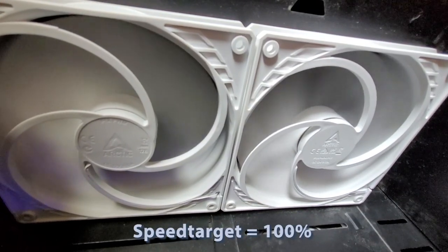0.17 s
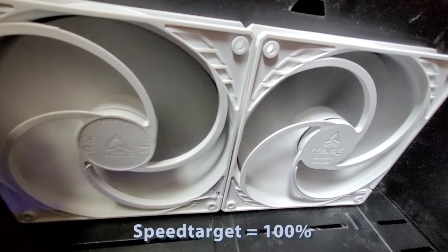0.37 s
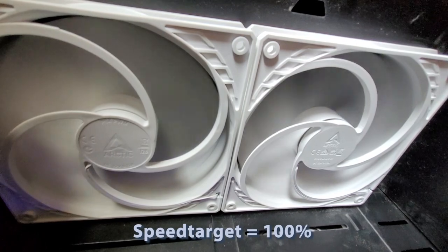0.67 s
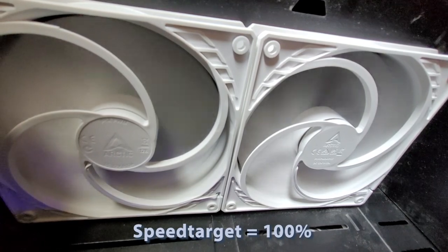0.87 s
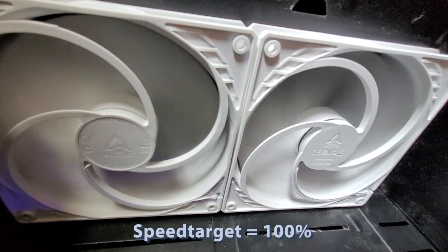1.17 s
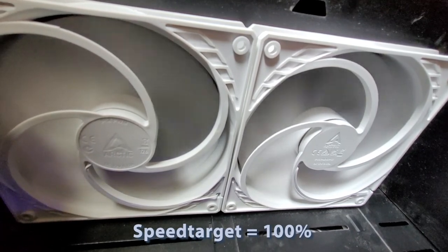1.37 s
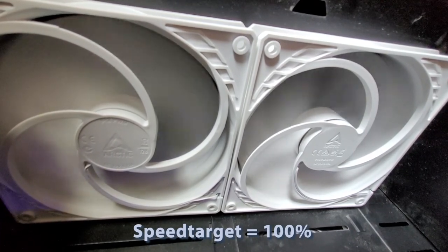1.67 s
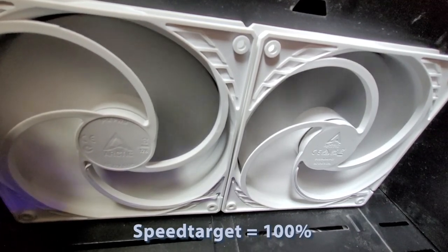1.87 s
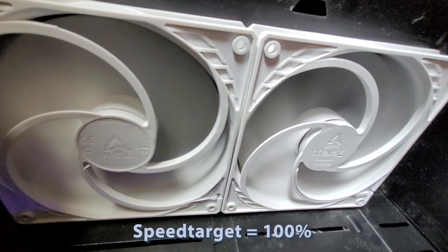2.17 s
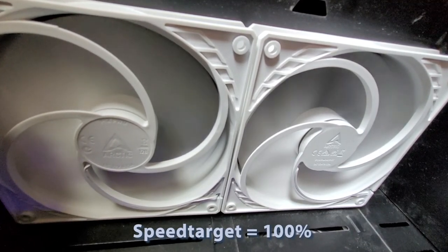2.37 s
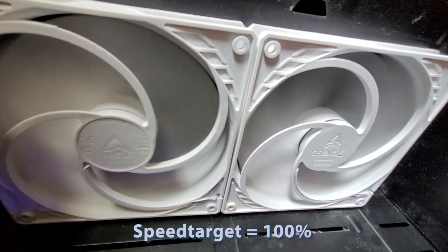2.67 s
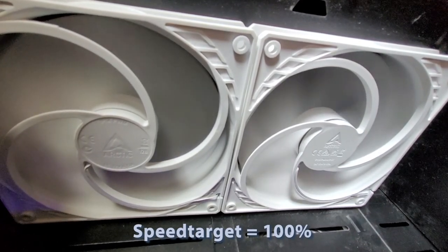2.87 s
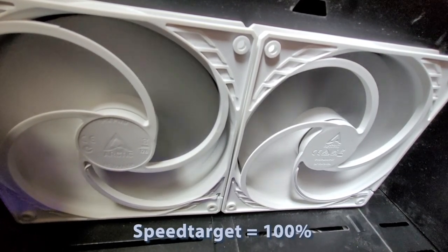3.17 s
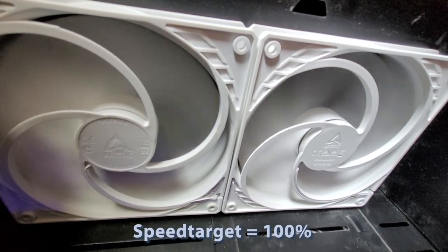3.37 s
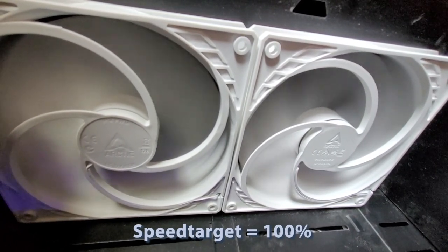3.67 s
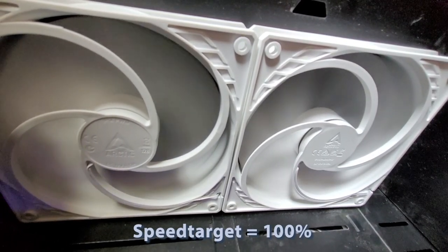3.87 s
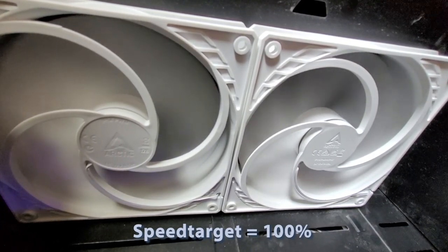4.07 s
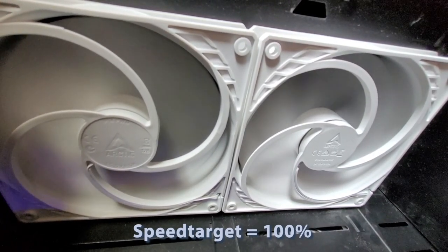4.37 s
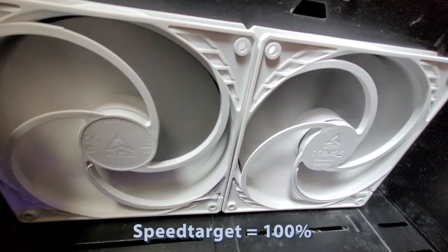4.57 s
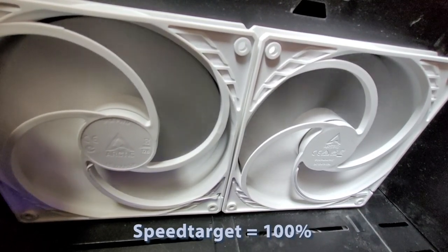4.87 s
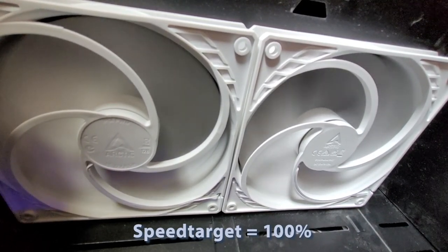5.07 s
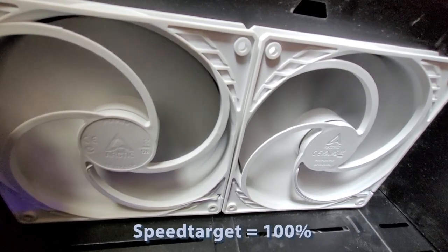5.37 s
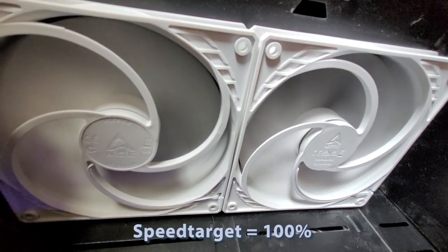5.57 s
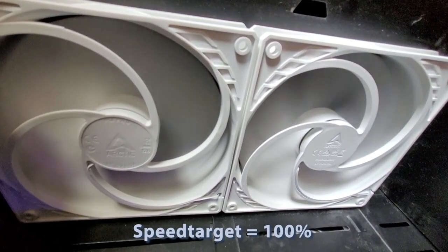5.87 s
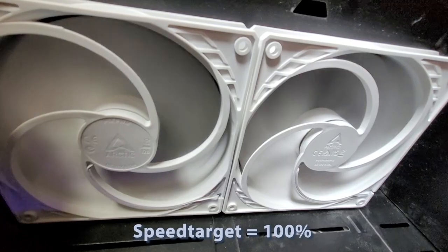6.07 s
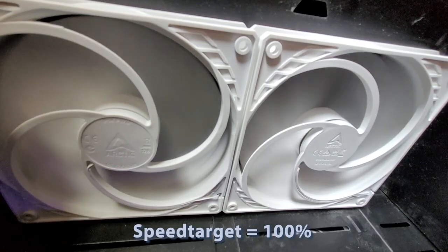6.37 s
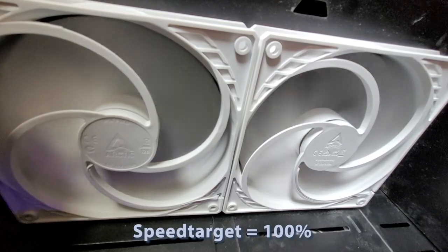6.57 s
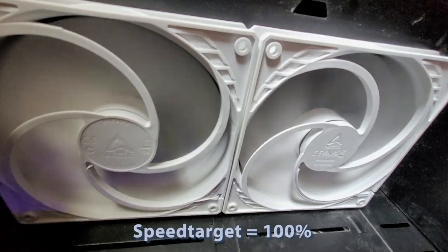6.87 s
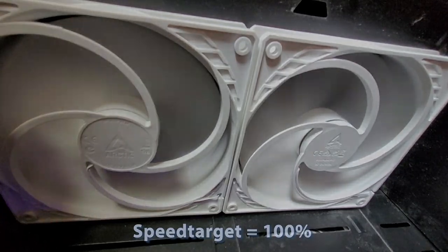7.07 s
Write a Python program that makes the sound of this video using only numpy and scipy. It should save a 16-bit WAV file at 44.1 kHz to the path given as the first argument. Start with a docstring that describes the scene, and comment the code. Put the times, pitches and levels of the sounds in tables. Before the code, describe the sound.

Constant whooshing of fast case fans with a droning low hum and faint whine, gusty low rumble and irregular soft thuds on the left.

```python
"""Two five-bladed computer case fans, heard by a phone close by inside the metal case.
Blade rush is shaped noise; it rings the case's cavities and a whirr of wavering pitch, with brief sizzles.
Each rotor adds sine tones on multiples of its own shaft speed, the two speeds slightly apart.
The draught rumbles on both microphone ports; eddies thump the left one and leak faintly to the right."""
import sys
import numpy as np
from scipy import signal
from scipy.fft import rfft, irfft
from scipy.io import wavfile
from scipy.ndimage import uniform_filter1d, minimum_filter1d

SR = 44100
rng = np.random.default_rng(int(sys.argv[2]) if len(sys.argv) > 2 else 0)


def transcribe(u):
    """Save the signal u as a 16-bit wav file named by the first command-line argument.

    u: samples, shape (n,) or (channels, n), limited to [-1, 1]; the rate is SR.
    q: integer samples, one column per channel.
    """
    v = np.clip(np.atleast_2d(u).T, -1, 1)
    q = np.round(v * 32767).astype(np.int16)
    wavfile.write(sys.argv[1], SR, q)


N = 317520
TIME = np.arange(N) / SR
FREQ_HZ = np.arange(N // 2 + 1) * SR / N

SLOW_FAN_HZ, FAST_FAN_HZ = 26.92, 27.465  # shaft turns per second

# strong eddies at the left port: start_s (centre), level_db (relative), pitch_hz,
# swirl (0 = one clean thump, 1 = all flutter)
STRONG_EDDIES = [(0.106, -16.0, 208.0, 0.49), (0.133, -13, 175, 0.65), (0.167, -14.5, 145.0, 0.43),
                 (0.186, -15.0, 94.0, 0.52), (0.234, -19.0, 299.0, 0.9), (0.242, -13, 101, 0.31),
                 (0.266, -17.5, 55, 0.2), (0.31, -8, 225, 0.45), (0.852, -19.5, 99.0, 0.34),
                 (1.112, -17.0, 120.0, 0.1), (1.481, -18.5, 99.0, 0.25), (1.502, -13.5, 172.0, 0.05),
                 (1.588, -12.5, 185, 0.5), (1.662, -13.0, 172.0, 0.4), (1.668, -13.5, 60.0, 0.05),
                 (1.817, -15.0, 145.0, 0.9), (1.828, -10.5, 203.0, 0.22), (1.893, -11.5, 120.0, 0.78),
                 (2.117, -17.5, 55.0, 0.9), (2.23, -10.5, 88, 0.2), (2.257, -19.0, 55.0, 0.46),
                 (2.42, -13.5, 145.0, 0.4), (2.789, -15.5, 139.0, 0.4), (2.808, -12.5, 241.0, 0.05),
                 (2.83, -12.5, 94.0, 0.4), (2.944, -15.5, 180.0, 0.13), (2.98, -14, 195, 0.7),
                 (2.987, -10.5, 132.0, 0.05), (3.002, -15.5, 117.0, 0.05), (3.016, -12, 120, 0.25),
                 (3.048, -16.5, 55.0, 0.9), (3.151, -18.0, 58.0, 0.9), (3.611, -18.0, 55.0, 0.76),
                 (3.677, -19.0, 78.0, 0.9), (4.301, -17.0, 88.0, 0.05), (4.356, -18.0, 58.0, 0.9),
                 (4.384, -12.0, 168.0, 0.22), (4.659, -16.5, 86.0, 0.05), (4.674, -16.5, 142.0, 0.9),
                 (4.76, -18.5, 55.0, 0.9), (4.818, -20.0, 55.0, 0.05), (4.846, -11.0, 224.0, 0.9),
                 (4.857, -15.0, 129.0, 0.9), (4.901, -10.5, 120.0, 0.76), (5.022, -12, 155, 0.6),
                 (5.034, -14.0, 63.0, 0.34), (5.141, -12.0, 66.0, 0.46), (5.208, -18.0, 99.0, 0.9),
                 (5.243, -20.5, 247.0, 0.05), (5.267, -15.0, 66.0, 0.61), (5.31, -13, 208, 0.35),
                 (5.614, -14.0, 153.0, 0.05), (5.628, -12.0, 106.0, 0.46), (5.648, -16.5, 76.0, 0.1),
                 (6.067, -17.5, 94.0, 0.9), (6.09, -9.5, 142.0, 0.1), (6.175, -10.5, 92.0, 0.37),
                 (6.249, -16.0, 106.0, 0.25), (6.397, -12.5, 94.0, 0.1), (6.587, -18.0, 86.0, 0.67),
                 (6.657, -7.0, 195.0, 0.6), (6.679, -9.5, 114.0, 0.55), (6.699, -16.5, 58.0, 0.9),
                 (6.954, -20.0, 129.0, 0.19), (7.164, -15.5, 106.0, 0.25), (7.179, -18, 55, 0.05)]
# slow fan's sounding multiples of shaft speed, blade pass first: order
SLOW_FAN_ORDERS = [5, 10, 15, 16, 30, 36]


def undb(db):
    """Decibels to gain."""
    return 10 ** (np.asarray(db) / 20)


def unit(x):
    """Scale to an rms of 1."""
    return x / np.sqrt(np.mean(x ** 2))


def walk(rate_hz):
    """Random levels held 1 / rate_hz and slewed twice; rms 1."""
    hold = int(SR / rate_hz)
    held = rng.standard_normal(2000)[np.arange(N) // hold]
    return unit(uniform_filter1d(uniform_filter1d(held, hold), hold))


def noise(points, white=None):
    """Noise of rms 1 with a spectrum of (Hz, relative dB) points, falling steeply outside them."""
    white = rng.standard_normal(N) if white is None else white
    hz, db = np.transpose(points)
    f = np.maximum(FREQ_HZ, 1)
    gain = undb(np.interp(np.log(f), np.log(hz), db))
    gain *= np.minimum(f / hz[0], 1) ** 2
    gain *= np.minimum(hz[-1] / f, 1) ** 20
    return unit(irfft(rfft(white) * gain, N))


def cut(x, hz, kind, order=2):
    """Low-pass or high-pass Butterworth filter."""
    return signal.sosfilt(signal.butter(order, hz, kind, fs=SR, output="sos"), x)


def resonance(white, hz, half_width_hz):
    """Turbulence ringing in one resonance, 6 dB down at half_width_hz off centre; rms 1."""
    return unit(irfft(rfft(white) / (1 + ((FREQ_HZ - hz) / half_width_hz) ** 2), N))


def port_pair():
    """White noise at the two ports, alike or opposed by band through standing waves in the case."""
    # likeness of the two ports: freq_hz, correlation (-1 to 1)
    likeness = [(600, -0.027), (730, -0.45), (860, 0.82), (980, 0.41), (1100, 0.2), (1240, 0.84),
                (1400, -0.62), (1550, 0.0064), (1750, -0.08), (1900, 0.94), (2130, 0.43), (2400, -0.03),
                (3400, -0.16), (5800, 0.057), (6500, -.35), (8000, 0.093)]
    alike = np.interp(FREQ_HZ, *np.transpose(likeness))
    mid = irfft(rfft(rng.standard_normal(N)) * np.sqrt(1 + alike), N)
    side = irfft(rfft(rng.standard_normal(N)) * np.sqrt(1 - alike), N)
    return mid + side, mid - side


def gusts(lull_db=-27.4, gust_db=-34, gust_s=0.09):
    """Left draught gain: each strong eddy adds gust power to the lull, a bell of spread gust_s."""
    swell = sum(np.exp(-0.5 * ((TIME - start_s) / gust_s) ** 2) for start_s, *_ in STRONG_EDDIES)
    return np.sqrt(undb(lull_db) ** 2 + undb(gust_db) ** 2 * swell)


def draught(right_db=-26.5, shared=0.19):
    """Low rumble of air over the ports, partly shared, gusty on the left and steadier on the right."""
    # draught spectrum: freq_hz, level_db (per Hz, relative)
    spectrum = [(15, -49), (30, -20.5), (48, -2.5), (66, -0.5), (92, -5.5), (115, -3.5), (142, -5),
                (175, -15.5), (205, -15.5), (265, -13.5), (350, -24), (425, -26), (500, -41), (800, -47.5)]
    # rms swell of the draught: left_db, right_db
    port_swells_db = (1.8, 1.2)
    both = np.sqrt(shared) * noise(spectrum)
    ports = []
    for gain, swell_db in zip([gusts(), undb(right_db)], port_swells_db):
        rumble = both + np.sqrt(1 - shared) * noise(spectrum)
        ports.append(gain * unit(rumble * undb(swell_db * walk(20))))
    return np.array(ports)


def weak_eddies(count=10, mean_db=-21.5, scatter_db=2.5, centre_hz=102):
    """Weak eddies at random moments, in the columns of STRONG_EDDIES."""
    eddies = []
    for _ in range(count):
        start_s = rng.uniform(0, TIME[-1])
        level_db = mean_db + scatter_db * rng.uniform(-1, 1)
        pitch_hz = centre_hz * 2 ** rng.uniform(-0.5, 0.5)
        eddies.append((start_s, level_db, pitch_hz, rng.uniform(0, 1)))
    return eddies


def port_ring(x, ring_hz=256, ring_db=-1, hollow_hz=205, hollow_depth=0.4, q=3):
    """The air around the port rings briefly after a push, with a hollow just below the resonance."""
    ring = signal.lfilter(*signal.iirpeak(ring_hz, q, fs=SR), x)
    hollow = signal.lfilter(*signal.iirpeak(hollow_hz, q, fs=SR), x)
    return x + undb(ring_db) * ring - hollow_depth * hollow


def buffets(trim_db=0.25, top_hz=235, top_pitch_hz=110, port_hz=53, leak_db=-28):
    """An eddy crossing the left port: a sharp suction in its core, inside a short turbulent swirl."""
    eddy_cycles = 3.3  # slow eddies last longer
    core_cycles, swirl_spread = 0.19, 0.36  # bell spreads: share of a cycle, share of eddy length
    swirl_edge = 0.74  # swirl's gentle low-pass, share of its pitch
    size = SR // 2
    t = (np.arange(size) - size // 2) / SR
    out = np.zeros(N + 2 * size)
    for start_s, level_db, pitch_hz, share in STRONG_EDDIES + weak_eddies():
        length_s = eddy_cycles / pitch_hz
        suction = -np.exp(-0.5 * (t * pitch_hz / core_cycles) ** 2) + 1e-12
        core = cut(suction, port_hz, "high", order=3)
        swirl = cut(rng.standard_normal(size), swirl_edge * pitch_hz, "low", order=1)
        # small, fast eddies reach higher; top_hz holds at top_pitch_hz
        swirl = cut(swirl, top_hz * np.sqrt(pitch_hz / top_pitch_hz), "low", order=3)
        swirl *= np.exp(-0.5 * (t / (swirl_spread * length_s)) ** 2)
        swirl = cut(swirl, port_hz, "high", order=5)
        core, swirl = unit(port_ring(core)), unit(port_ring(swirl))
        eddy = unit(np.sqrt(1 - share) * core + np.sqrt(share) * swirl)
        # the eddy spends its power over its length
        gain = undb(level_db + trim_db) * np.sqrt(length_s * SR / size)
        first = int(start_s * SR) + size // 2
        out[first:first + size] += gain * eddy
    return np.outer([1, undb(leak_db)], cut(out[size:size + N], 550, "low"))


def sizzles():
    """The treble of the rush flares for a moment: bells of narrow-band noise."""
    # flares: start_s (centre), level_db, spread_s, freq_hz, half_width_hz
    flares = [(1.79, -58, 0.025, 4200, 600), (1.84, -68, 0.069, 8200, 600)]
    out = np.zeros((2, N))
    for start_s, level_db, spread_s, hz, half_width_hz in flares:
        swell = undb(level_db) * np.exp(-0.5 * ((TIME - start_s) / spread_s) ** 2)
        whites = rng.standard_normal((2, N))
        out += swell * np.array([resonance(white, hz, half_width_hz) for white in whites])
    return out


def whirr(centre_hz=1246, half_width_hz=26, stray_hz=17, strays_per_s=20):
    """Blades whirring in their frames: a narrow resonance whose pitch wavers with the uneven flow."""
    # whirr level before airflow: left_db, right_db
    port_db = (-64.5, -44)
    angle = 2 * np.pi * np.cumsum(stray_hz * walk(strays_per_s)) / SR
    ring = signal.hilbert([resonance(white, centre_hz, half_width_hz) for white in port_pair()])
    return undb(port_db)[:, None] * np.real(ring * np.exp(1j * angle))


def cavities():
    """The flow rings the air in the case and the fan frames; each port hears its own share."""
    # air resonances before airflow: freq_hz, half_width_hz, left_db, right_db
    modes = [ (725, 40, -62, -50), (963, 24, -53.5, -51.5), (1080, 110, -62.5, -55.5),
             (1277, 94, -68, -51.5), (1376, 30, -66, -60.5), (1508, 40, -61, -58), (1590, 140, -61, -55.5),
             (3174, 110, -69.5, -66), (4830, 130, -69, -69.5)]
    pair = port_pair()
    out = np.zeros((2, N))
    for hz, half_width_hz, *port_db in modes:
        ring = np.array([resonance(white, hz, half_width_hz) for white in pair])
        out += undb(port_db)[:, None] * ring
    return out


def rotor(shaft_hz, orders, levels_db, wobble=0.00054, waver_db=0.9, jostle_rad=0.18):
    """Tones locked to one shaft; uneven inflow makes each one waver in level and phase."""
    angle = 2 * np.pi * np.cumsum(shaft_hz * (1 + wobble * walk(2.056))) / SR
    out = np.zeros((2, N))
    for order, port_db in zip(orders, levels_db):
        phase = order * angle + jostle_rad * walk(22) + rng.uniform(0, 2 * np.pi)
        tone = np.sin(phase) * undb(waver_db * walk(6))
        out += undb(port_db)[:, None] * unit(tone)
    return out


def rotors():
    """Hum and whine of both fans: blade passes, struts and motor poles."""
    # fast fan's sounding multiples of shaft speed: order
    fast_orders = [10, 13, 16, 20, 54, 58, 62]
    # slow fan tones, row per order: left_db, right_db
    slow_levels = [(-34, -37), (-64, -64), (-51, -61), (-63, -69), (-63, -62), (-63, -57.5)]
    # fast fan tones, row per order: left_db, right_db
    fast_levels = [(-44.5, -43), (-66, -62), (-60, -62), (-59, -64), (-73, -61.5), (-72, -61.5),
                   (-75, -70.5)]
    slow = rotor(SLOW_FAN_HZ, SLOW_FAN_ORDERS, slow_levels)
    return slow + rotor(FAST_FAN_HZ, fast_orders, fast_levels)


def rush(left_db=-39.0, right_db=-41.0, hiss_db=-73, hiss_flutter_db=0.5, flutter_db=0.5,
         turn_chop=0.084, blade_chop=0.046):
    """Fluttering air noise off the blades, chopped by the fast fan's turns and slow fan's blades."""
    # rush at the left port: freq_hz, level_db (per Hz, relative)
    left_spectrum = [(200, 10), (600, 3.5), (900, -1.5), (1150, 3), (1250, 3.5), (1440, -2), (1750, -5),
                     (2130, -3), (2300, -11), (3100, -12.5), (3800, -16), (5200, -18.5), (6500, -23.5),
                     (7900, -25), (8600, -35)]
    # rush at the right port: freq_hz, level_db (per Hz, relative)
    right_spectrum = [(200, -17.5), (600, 3.5), (850, 1.5), (1150, 2), (1450, -2), (1650, -0.5), (1950, -4),
                      (2300, -13.5), (2600, -15), (3100, -13), (4800, -16), (6300, -22), (7300, -21),
                      (7900, -25), (8600, -42)]
    # fine hiss above the rush: freq_hz, level_db (per Hz, relative)
    hiss_spectrum = [(7500, -8), (8800, 11), (11600, 11), (12200, 7.5), (15500, 5)]
    left, right = port_pair()
    air = np.array([undb(left_db) * noise(left_spectrum, left),
                    undb(right_db) * noise(right_spectrum, right)])
    hiss_gain = undb(hiss_db + hiss_flutter_db * walk(14))
    hiss = hiss_gain * np.array([noise(hiss_spectrum), noise(hiss_spectrum)])
    turn = np.sin(2 * np.pi * FAST_FAN_HZ * TIME)
    blade = np.sin(2 * np.pi * SLOW_FAN_ORDERS[0] * SLOW_FAN_HZ * TIME)
    chop = 1 + turn_chop * turn + blade_chop * blade
    return (air + hiss) * undb(flutter_db * walk(18)) * chop


def scene():
    """The airflow carries rush, case resonances and whirr; tones, sizzles and port wind lie on top."""
    # airflow, nearly steady, easing off at the end: time_s, level_db (gain on what it carries)
    flow_points = [(0, -0.84), (1.9, 0), (3.9, -0.5), (4.8, 0.5), (5.7, -0.95), (6.85, -0.5), (7.2, -3.5)]
    flow = undb(np.interp(TIME, *np.transpose(flow_points)))
    carried = flow * (rush() + cavities() + whirr())
    return carried + sizzles() + rotors() + draught() + buffets()


def record(dry):
    """The phone's limiter eases peaks above its ceiling, then a steep low-pass cuts the top."""
    ceiling, hold = 0.95, SR // 100  # full scale = 1; samples
    top_hz = 15700
    needed = ceiling / np.maximum(np.abs(dry), ceiling)
    gain = uniform_filter1d(minimum_filter1d(needed, hold), hold)
    low_pass = signal.ellip(8, 0.2, 70, top_hz, fs=SR, output="sos")
    return signal.sosfilt(low_pass, dry * gain)


dry = scene()
out = record(dry)
transcribe(out)
```